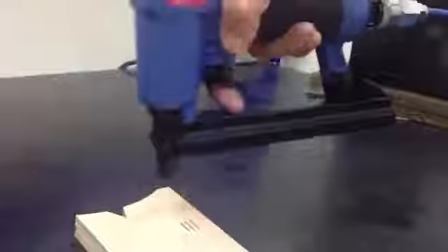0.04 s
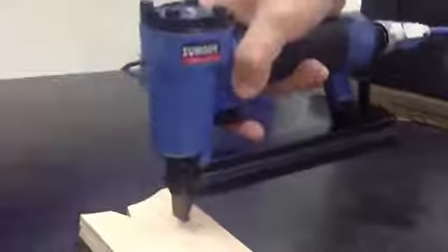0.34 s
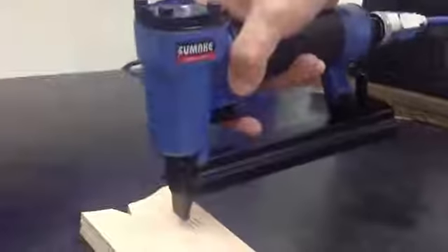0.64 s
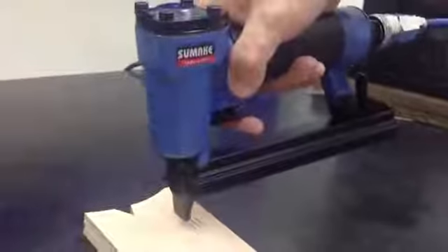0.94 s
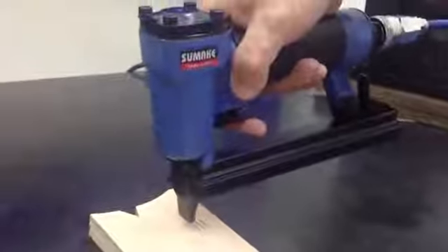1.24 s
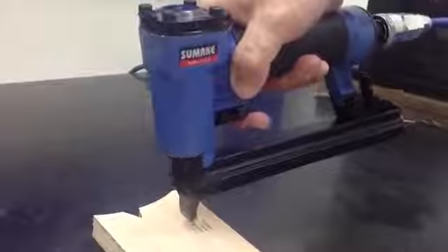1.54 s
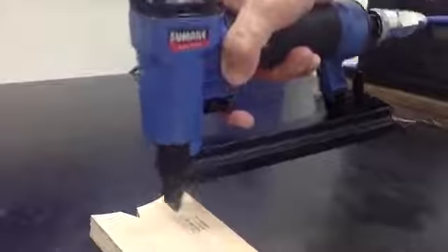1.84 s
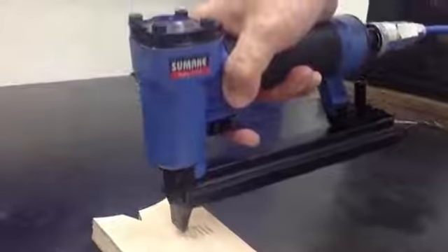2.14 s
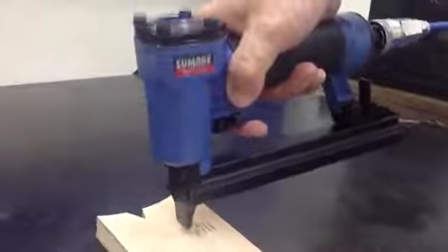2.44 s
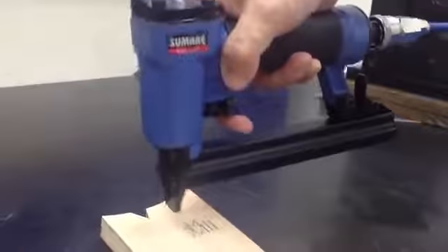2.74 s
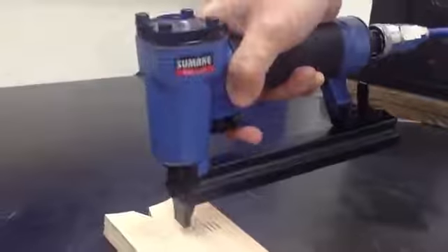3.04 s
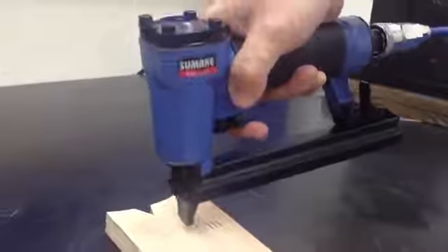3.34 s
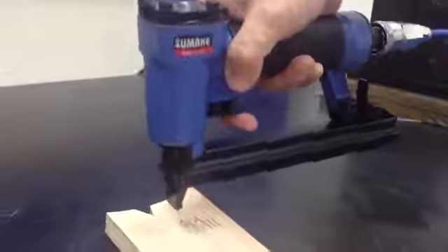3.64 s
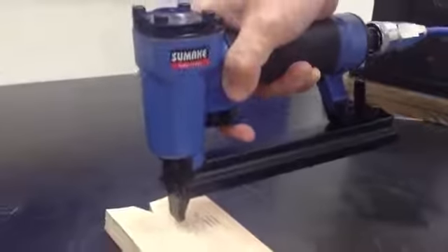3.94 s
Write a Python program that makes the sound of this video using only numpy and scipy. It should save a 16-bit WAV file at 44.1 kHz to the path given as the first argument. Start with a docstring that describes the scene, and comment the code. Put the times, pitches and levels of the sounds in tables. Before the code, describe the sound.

A pneumatic stapler fires three times into wood, each crack followed by an air blast.

```python
"""A reverberant workshop: a pneumatic stapler drives three staples into a wooden block on a bench, close up.
Each shot: the valve leaks, air rushes in, the driver cracks down and the tool rings. A fifth of a second
later the trigger is let go: a short hiss, a blast of exhaust, and the piston knocks home. Air noise,
hum, hiss and small scrapes lie underneath. A fast limiter flattens the peaks."""
import sys
import numpy as np
from scipy import signal
from scipy.io import wavfile
from scipy.ndimage import uniform_filter1d

SR = 44100
rng = np.random.default_rng(int(sys.argv[2]) if len(sys.argv) > 2 else 0)


def write(x):
    x = np.atleast_2d(x).T
    wavfile.write(sys.argv[1], SR, np.round(np.clip(x, -1, 1) * 32767).astype(np.int16))


N = 4 * SR
BAND_EDGE_HZ = 15030
AIR_ATTACK_S, AIR_FADE_S = 0.001, 0.0015


def amp(db):
    """Decibels to gain."""
    return 10 ** (np.asarray(db) / 20)


def clock():
    """Time in seconds, with a quarter-second lead-in."""
    return np.arange(-(SR // 4), N) / SR


def gain_curve(points):
    """Gain over time from (t/s, level/dB) points."""
    return amp(np.interp(clock(), *np.transpose(points)))


def at_hz(points, hz):
    """Table lookup on a log-frequency axis."""
    f, value = np.transpose(points)
    return np.interp(np.log(hz + 1), np.log(f + 1), value)


def colour(x, spectrum, size=4096):
    """Minimum-phase filter of unit energy: only the spectrum's shape counts."""
    hz = np.minimum(abs(np.fft.fftfreq(size, 1 / SR)), BAND_EDGE_HZ)
    log_gain = np.log(amp(at_hz(spectrum, hz)))
    taps = np.fft.ifft(np.exp(np.conj(signal.hilbert(log_gain)))).real[:size // 2]
    return signal.oaconvolve(x, taps / np.linalg.norm(taps))[:len(x)]


def bandpass(x, hz, width_hz):
    """One resonance."""
    return signal.lfilter(*signal.iirpeak(hz, hz / width_hz, SR), x)


def resonate(x, peaks):
    """Adds resonances to the sound."""
    return x + sum(amp(db) * bandpass(x, hz, width_hz) for hz, width_hz, db in peaks)


def white():
    """Gaussian noise."""
    return rng.standard_normal(len(clock()))


def even_noise(size=512):
    """Noise with a flattened short-time spectrum, so brief bursts share one colour."""
    x = white()
    for _ in range(3):
        bins = signal.stft(x, nperseg=size)[2]
        x = signal.istft(bins / (abs(bins) + 1e-12), nperseg=size)[1][:len(x)]
    return x / x.std()


def burst(start_s, attack_s, hold_s, fade_s):
    """Linear attack, hold, exponential release."""
    t = clock() - start_s
    return np.clip(t / attack_s, 0, 1) * np.exp(-np.maximum(t - hold_s, 0) / fade_s)


# background spectra: f/Hz, level/dB
AMBIENT_SPECTRUM = [(15, -71), (25, -52.5), (75, -32.5), (106, -15), (139, -18.5), (176, -3), (207, -10),
                    (293, -3.5), (501, -16.5), (655, -11), (769, -17), (1180, -16), (1420, -21),
                    (3630, -30), (15000, -49.5)]
HISS_SPECTRUM = [(100, -30.5), (1500, -2), (3500, 3.5), (8000, 2), (11000, -9), (15000, -10.5)]
# background levels: t/s, level/dB
AMBIENT_LEVELS = [(0, -65), (.6, -60.5), (1.05, -59.5), (1.5, -58), (2.2, -65), (2.5, -60), (3.2, -63),
                  (4, -63)]
HISS_LEVELS = [(0, -64), (.52, -70), (.65, -103), (1.25, -84.5), (1.55, -74.5), (2.33, -78), (2.47, -69),
               (2.6, -70.5), (3.3, -80.5), (4, -85.5)]
HUM_LEVELS = [(0, -71), (.9, -68), (1.04, -54.5), (1.15, -67), (1.35, -60), (1.6, -68.5), (2.5, -61.5),
              (3.3, -70), (4, -71)]


def workshop():
    """Air noise, faint hiss and a wavering hum."""
    air = colour(white(), AMBIENT_SPECTRUM) * gain_curve(AMBIENT_LEVELS)
    hiss = colour(white(), HISS_SPECTRUM) * gain_curve(HISS_LEVELS)
    hum = bandpass(white(), hz=179, width_hz=22)
    return air + hiss + hum / hum.std() * gain_curve(HUM_LEVELS)


# room decay: f/Hz, T60/s
ROOM_DECAY = [(100, 0.61), (400, .55), (1000, 0.32), (2700, 0.37), (7000, 0.4), (10000, 0.33),
              (15000, 0.26)]


def room(envelope, spectrum, delay_s=0.0035, build_s=0.002, late_db=-25.5, late_t60_s=0.8):
    """Diffuse tail: each band stores energy and loses it at its own rate, over a faint late echo."""
    size, hop = 256, 64
    hz, _, bins = signal.stft(white(), SR, nperseg=size, noverlap=size - hop)
    power_in = uniform_filter1d(envelope ** 2, hop)[::hop]
    t = np.arange(SR // hop) * hop / SR
    early = amp(-60 * t / at_hz(ROOM_DECAY, hz)[:, None]) ** 2
    late = amp(late_db - 60 * t / late_t60_s) ** 2
    decay = np.clip((t - delay_s) / build_s, 0, 1) * (early + late)
    decay /= decay.sum(1, keepdims=True)
    stored = signal.fftconvolve(power_in[None], decay, axes=1)[:, :bins.shape[1]]
    tail = signal.istft(bins * np.sqrt(abs(stored)), SR, nperseg=size, noverlap=size - hop)[1]
    return colour(tail[:len(envelope)], spectrum)


def bench(x, relative_db=-7, fade_s=0.007, low_cut_hz=2500):
    """Early treble reflections off the bench ripple every shot alike."""
    t = np.arange(SR // 32) / SR
    highpass = signal.butter(2, low_cut_hz, "high", fs=SR, output="sos")
    taps = signal.sosfilt(highpass, rng.standard_normal(len(t))) * np.exp(-t / fade_s)
    reflections = signal.oaconvolve(x, taps / np.linalg.norm(taps))[:len(x)]
    return (x + amp(relative_db) * reflections) / np.hypot(1, amp(relative_db))


# scrapes: t/s, length/s, level/dB
SCRAPES = [(0.34, 0.11, -65), (2.544, 0.021, -56.5)]
# friction spectrum: f/Hz, level/dB
SCRAPE_SPECTRUM = [(100, -7.5), (500, -0.5), (750, -2), (1100, 2), (2300, -3), (4000, -13.5), (6500, -19),
                   (7800, -9), (10000, -23.5), (15000, -24.5)]
# housing resonances: f/Hz, width/Hz, level/dB
SCRAPE_PEAKS = [(1040, 70, 8.5), (1240, 80, -1.5)]


def scrapes(attack_s=0.008, fade_s=0.024):
    """Tool and hand shift on the wood; the housing answers."""
    friction = sum(amp(db) * burst(s, attack_s, length_s, fade_s) for s, length_s, db in SCRAPES)
    return resonate(colour(white() * friction, SCRAPE_SPECTRUM), SCRAPE_PEAKS)


# leaks: t/s, length/s, level/dB
VALVE_LEAKS = [(1.5832, 0.0072, -25.5), (1.8, 0.014, -28), (2.578, .004, -23.5), (2.750, .012, -27.5),
               (3.505, 0.004, -24), (3.691, 0.014, -26.5)]
# leak spectrum: f/Hz, level/dB
LEAK_SPECTRUM = [(100, -22.5), (1500, -19), (4000, -17), (6300, -20.5), (7600, 7), (9500, 0), (12000, -2.5),
                 (14500, 1)]


def valve_leak(swell_db=8):
    """A thin leak past the trigger valve swells until the valve flips."""
    flow = 0
    for s, length_s, db in VALVE_LEAKS:
        progress = np.clip((clock() - s) / length_s, 0, 1)
        flow += amp(db + swell_db * (progress - 1)) * burst(s, AIR_ATTACK_S, length_s, AIR_FADE_S)
    return colour(flow * white(), LEAK_SPECTRUM)


# cylinder fills: t/s, length/s, rush level/dB, push level/dB
FILLS = [(1.5936, .002, -8.5, -50.5), (1.597, 0.0047, -12, -28), (2.578, 0.0062, -13, -43),
         (2.5848, 0.0051, -9, -24), (3.5099, 0.0072, -9.5, -19)]
# inrush spectra: f/Hz, level/dB
RUSH_SPECTRUM = [(100, -28.5), (700, -20), (1800, -19), (3500, -12.5), (6000, -13), (9000, 0),
                 (11500, -4.5), (13500, 1), (14800, 1.5)]
PUSH_SPECTRUM = [(30, -21.5), (110, -19), (220, 1.5), (500, -4.5), (800, -11.5), (1800, -10), (4000, -18),
                 (15000, -45.5)]


def inrush(rush_room_db=-8, push_room_db=-7.5):
    """Air slams into the cylinder: a hissing rush and a low push."""
    rush = push = 0
    for s, length_s, rush_db, push_db in FILLS:
        flow = burst(s, AIR_ATTACK_S, length_s, AIR_FADE_S)
        rush += amp(rush_db) * flow
        push += amp(push_db) * flow
    direct = colour(rush * even_noise(), RUSH_SPECTRUM) + colour(push * even_noise(), PUSH_SPECTRUM)
    tail = amp(rush_room_db) * room(rush, RUSH_SPECTRUM) + amp(push_room_db) * room(push, PUSH_SPECTRUM)
    return direct + tail


# piston impacts: t/s, level/dB
PISTON_KNOCKS = [(1.8529, -8), (1.857, -14.5), (1.8618, -13.5), (2.802, -24), (2.8072, -10),
                 (2.8118, -22.5), (3.745, -11), (3.751, -5), (3.7556, -15)]
# knock spectrum: f/Hz, level/dB
KNOCK_SPECTRUM = [(25, -16), (80, -13.5), (160, 3), (330, 1.5), (700, -3.5), (1500, -9), (2600, -1),
                  (5000, -20.5), (15000, -27.5)]


def piston(attack_s=0.00043, hold_s=0.00069, fade_s=0.002):
    """The piston returns to its stop and bounces with dull knocks."""
    force = sum(amp(db) * burst(s, attack_s, hold_s, fade_s) for s, db in PISTON_KNOCKS)
    return colour(force * even_noise(), KNOCK_SPECTRUM)


# exhaust blasts, the first in the lead-in: t/s, length/s, level/dB
BLASTS = [(-.062, 0.047, -14), (1.822, .045, -14.5), (2.7709, 0.036, -14), (3.7144, 0.041, -15)]
# jet, valve snap and room tail spectra: f/Hz, level/dB
JET_SPECTRUM = [(30, -23.5), (100, -9.5), (230, 4), (450, -1), (1000, 1.5), (1600, 1.5), (2500, 1.5),
                (4000, -1), (6500, -5), (9300, -0.5), (11500, -2), (14500, -4.5)]
SNAP_SPECTRUM = [(60, -15), (300, -3.5), (900, -1.5), (1500, 0), (3000, -7), (7000, -5), (10000, 1),
                 (14500, 5)]
JET_TAIL_SPECTRUM = [(60, -29), (200, -10.5), (280, -11.5), (370, -8), (500, -16.5), (620, -8), (720, -3.5),
                     (830, -5), (1000, 0), (1130, -2.5), (1200, -5.5), (1350, -3.5), (1600, -6.5),
                     (2300, -4.5), (3500, -6), (6500, -4.5), (9300, 0), (11500, -3.5), (14500, 0.5)]
# housing resonances: f/Hz, width/Hz, level/dB
JET_PEAKS = [(215, 46, -5), (360, 32, 1), (716, 54, 0), (1040, 35, 1), (1084, 25, -2), (1840, 19, -1),
             (2210, 220, -1), (2510, 150, 0), (3320, 45, -4), (3800, 41, -4), (4285, 85, -2.5),
             (9550, 200, -7.5)]


def exhaust(sag_db_per_s=35, snap_db=-17.5, room_db=-0.5):
    """The valve snaps open; the cylinder dumps its air in a turbulent jet that sags with the pressure."""
    flow = opening = 0
    for s, length_s, db in BLASTS:
        sag_db = sag_db_per_s * np.maximum(clock() - s, 0)
        flow += amp(db - sag_db) * burst(s, AIR_ATTACK_S, length_s, fade_s=0.0053)
        opening += amp(snap_db) * burst(s, AIR_ATTACK_S, hold_s=0.0042, fade_s=0.002)
    jet = colour(flow * white(), JET_SPECTRUM)
    snap = colour(opening * white(), SNAP_SPECTRUM)
    tail = resonate(room(flow, JET_TAIL_SPECTRUM), JET_PEAKS)
    return jet + snap + amp(room_db) * tail


# two blows a shot, meeting the staple then sinking it: t/s, level/dB
DRIVER_BLOWS = [(1.608, -12.5), (1.6118, -10.5), (2.5949, -11.5), (2.599, -12), (3.5213, -12.5),
                (3.525, -10)]
# tool modes: f/Hz, level/dB, T60/s
TOOL_MODES = [(413, -5, .4), (514, -7, .36), (1870, -3, .28), (2473, -6, .3), (2676, -5, .26),
              (2918, -14, .28), (3361, -2, .16), (4156, -10, .27), (5383, -14, .3), (5836, -14, .3)]
# crack and room tail spectra: f/Hz, level/dB
CRACK_SPECTRUM = [(25, -11), (70, -11), (150, 3), (400, -3.5), (900, 4.5), (2500, 3.5), (5000, -1),
                  (8000, -1), (11000, -7), (14500, -7.5)]
CRACK_TAIL_SPECTRUM = [(60, -29), (170, -7), (300, 6), (480, 4.5), (750, 1), (1400, -2), (2700, -1.5),
                       (4500, -5.5), (7000, -8.5), (10000, -26.5), (14500, -27)]
# broad tool body resonances: f/Hz, width/Hz, level/dB
CRACK_PEAKS = [(1880, 89, -2), (2500, 110, -5.5), (2660, 150, -5), (4120, 180, -7)]


def driver(attack_s=0.00047, hold_s=0.0028, fade_s=0.0025, ring_db=-31.5, room_db=-5.5):
    """The steel blade crunches the staple into the wood and sets the tool ringing."""
    force = sum(amp(db) * burst(s, attack_s, hold_s, fade_s) for s, db in DRIVER_BLOWS)
    t = np.arange(SR // 2) / SR
    ring = sum(amp(db - 60 * t / t60_s) * np.sin(2 * np.pi * (hz * t + rng.random()))
               for hz, db, t60_s in TOOL_MODES)
    hardest_db = max(db for _, db in DRIVER_BLOWS)
    strikes = np.zeros(len(force))
    for s, db in DRIVER_BLOWS:
        strikes[np.searchsorted(clock(), s)] = amp(db - hardest_db)
    ringing = signal.fftconvolve(strikes, ring)[:len(force)]
    crack = colour(force * even_noise(), CRACK_SPECTRUM)
    tail = resonate(room(force, CRACK_TAIL_SPECTRUM), CRACK_PEAKS)
    return crack + amp(ring_db) * ringing + amp(room_db) * tail


def scene():
    """Mono mix, lead-in dropped."""
    stapler = valve_leak() + inrush() + bench(driver() + exhaust()) + piston()
    return (stapler + workshop() + scrapes())[None, -N:]


def record(dry):
    """Fast peak limiter, then the band limit."""
    limit_db, release_db_per_s = -4, 2496
    level_db = 20 * np.log10(abs(dry[0]) + 1e-9)
    release_db = np.arange(N) * release_db_per_s / SR
    peak_db = np.maximum.accumulate(level_db + release_db) - release_db
    over_db = np.maximum(peak_db - limit_db, 0)
    limited = dry * amp(-uniform_filter1d(over_db, size=16))
    lowpass = signal.firwin(801, BAND_EDGE_HZ, window=("kaiser", 8), fs=SR)
    return signal.oaconvolve(limited, lowpass[None], "same")


dry = scene()
out = record(dry)
write(out)
```